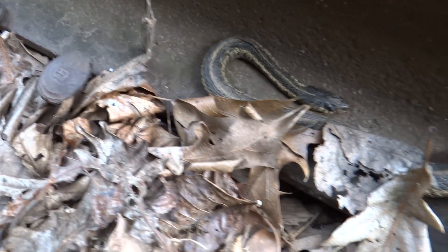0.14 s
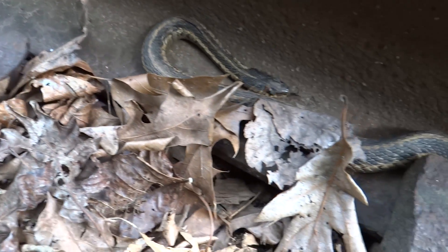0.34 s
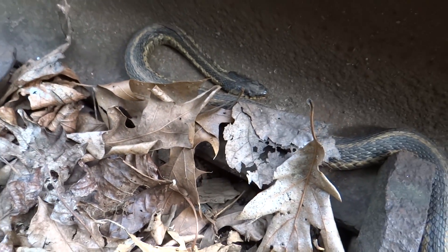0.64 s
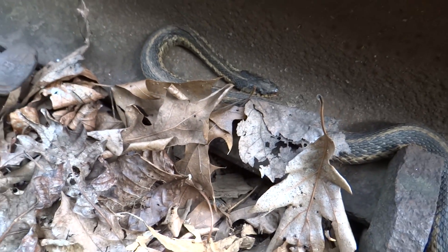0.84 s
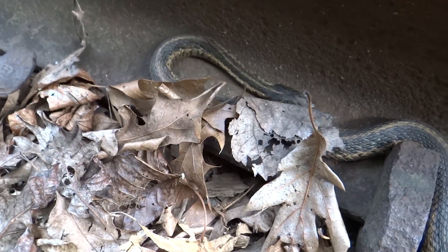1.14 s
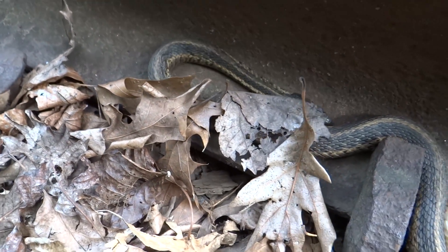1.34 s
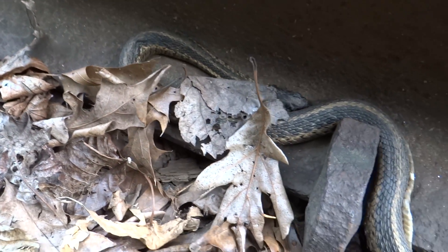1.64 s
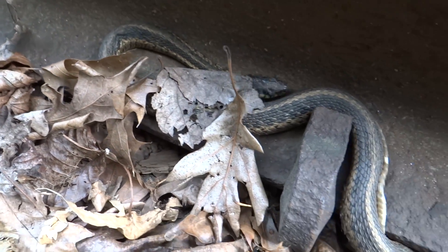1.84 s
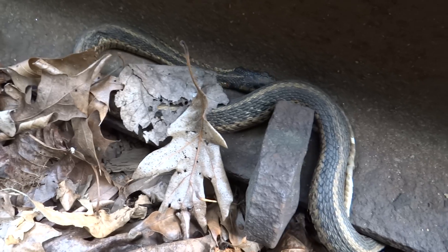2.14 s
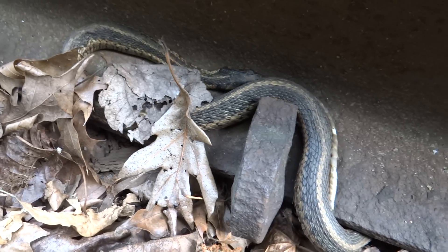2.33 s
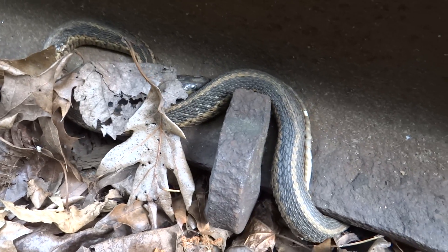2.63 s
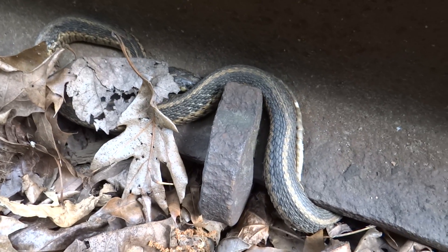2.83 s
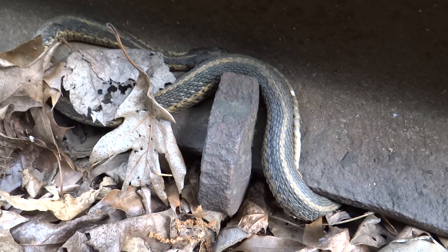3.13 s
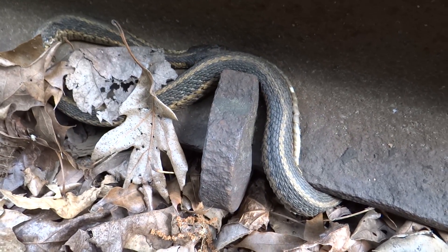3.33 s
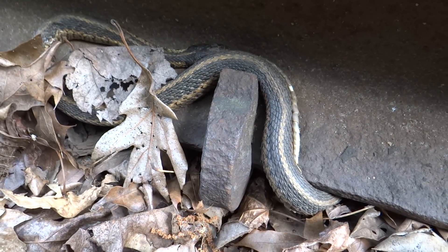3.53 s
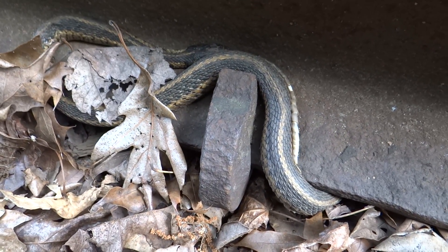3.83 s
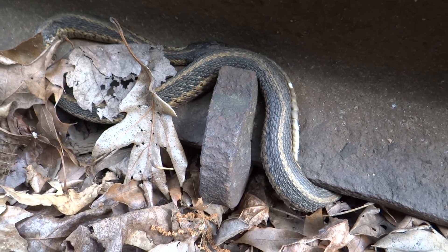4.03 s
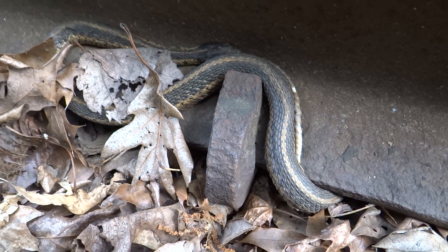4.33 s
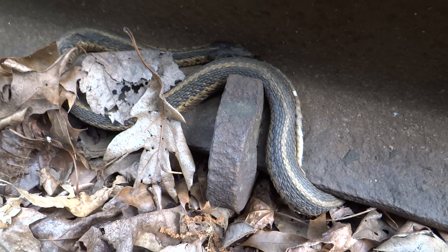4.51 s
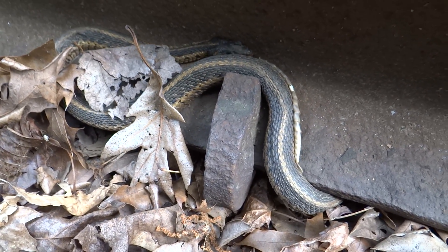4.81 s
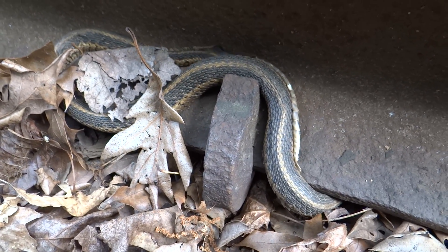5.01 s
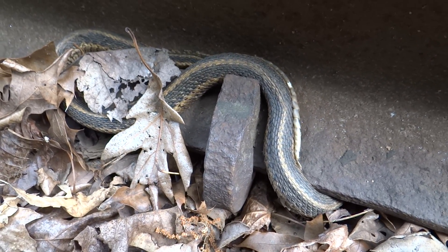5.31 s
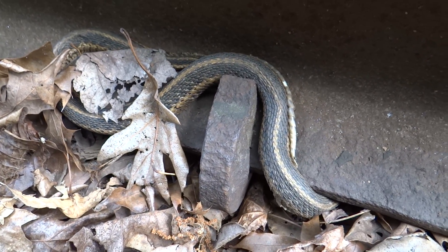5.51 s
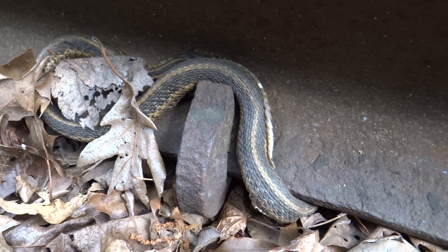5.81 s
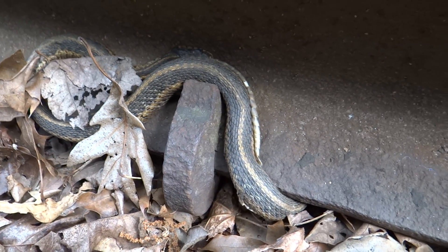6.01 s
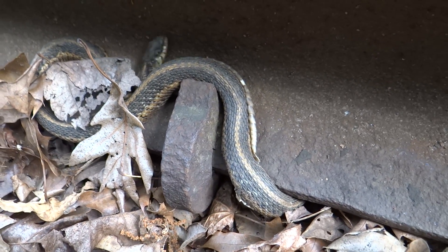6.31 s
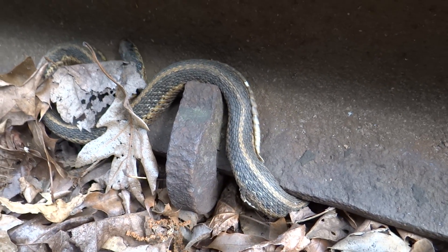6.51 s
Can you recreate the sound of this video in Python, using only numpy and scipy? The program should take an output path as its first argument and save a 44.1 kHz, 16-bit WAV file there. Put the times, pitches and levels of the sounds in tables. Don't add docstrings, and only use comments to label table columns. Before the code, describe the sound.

A snake slides through dry oak leaves on stone, with crisp rustling, ticks and snaps over a faint insect drone.

```python
import sys
import numpy as np
from scipy import signal
from scipy.fft import rfft, irfft, next_fast_len
from scipy.io import wavfile

SR = 44100
rng = np.random.default_rng(int(sys.argv[2]) if len(sys.argv) > 2 else 0)


def convert_level_to_amplitude(level_db):
    exponent = np.asarray(level_db, float) / 20
    return 10 ** exponent


def generate_wav(signal):
    frames = np.transpose(np.atleast_2d(signal))
    scaled = np.clip(frames, -1, 1) * 32767
    pcm = np.round(scaled).astype(np.int16)
    wavfile.write(sys.argv[1], SR, pcm)


N = 293485

# (time [s], scraping left-right [dB], cracks left-right [dB],
# finest hiss re scraping [dB])
COIL_PLACE = [(0, -2.5, 2.5, -21), (2.4, -1, 3.5, -22), (2.5, -0.5, 3.5, -17), (3.3, -1, 3.5, -18),
              (4.1, -7, -5, -14), (4.33, -3, -5.5, -4), (4.8, -4.5, -6.5, -10), (4.95, 0, 2, -20),
              (5.3, -6.5, -2.5, -15), (5.9, -1.5, -9, -14), (6.03, -.5, -0.5, -15), (6.65, 0, 5, -24)]


def in_time(rows):
    s, *columns = np.transpose(rows)
    return [np.interp(np.arange(N) / SR, s, column) for column in columns]


def at_hz(points, hz):
    point_hz, point_db = np.array(points).T
    return np.interp(np.log(hz + 1), np.log(point_hz), point_db)


def rms_one(x):
    return x / np.sqrt(np.mean(x ** 2) + 1e-20)


def drift(rate):
    knots = rng.standard_normal(400)
    return np.interp(np.arange(N) / SR * rate, np.arange(len(knots)), knots)


def band_filter(x, low_hz, high_hz):
    return signal.sosfilt(signal.butter(2, [low_hz, high_hz], "band", fs=SR, output="sos"), x)


def resonance(x, hz, width_hz):
    r = np.exp(-np.pi * width_hz / SR)
    poles = [1, -2 * r * np.cos(2 * np.pi * hz / SR), r * r]
    return signal.lfilter([(1 - r * r) / 2, 0, (r * r - 1) / 2], poles, x)


def add(out, s, sound, peak_db, pan_db):
    top = np.argmax(np.abs(sound))
    at = max(round(s * SR) - top, 0)
    sound = (sound / np.abs(sound[top]))[:N - at] * convert_level_to_amplitude(peak_db)
    out[:, at:at + len(sound)] += sound * convert_level_to_amplitude(np.array([[pan_db / 2], [-pan_db / 2]]))


def effort():
    # (time [s], scraping level [dB])
    creep = [(0, -52), (.35, -65), (.5, -58), (.93, -58), (1.0, -47), (2.4, -47), (2.7, -56.5), (3.25, -50),
             (3.35, -62), (3.8, -62), (4.33, -52.5), (4.9, -49.5), (5.7, -48), (6.3, -46.5), (6.65, -44)]
    # (start [s], hold [s], scraping level [dB])
    pushes = [(0, .01, -44.5), (0.067, .03, -45), (0.166, 0.17, -47.5), (0.95, .03, -46.5),
              (1.1, 0.1, -42.5), (1.203, 0.045, -41.5), (1.38, 0.069, -48), (1.897, 0.031, -47),
              (1.993, 0.027, -48), (2.182, 0.047, -44.5), (2.296, 0.077, -50), (2.527, 0.033, -41),
              (2.567, 0.084, -47.5), (2.782, 0.043, -51), (3.058, 0.044, -42.5), (3.223, .01, -43),
              (4.436, 0.19, -52), (4.733, 0.038, -46), (5.11, .03, -56), (5.275, 0.0046, -47),
              (5.37, 0.11, -46.5), (5.555, .05, -50), (5.72, .03, -44.5), (6.043, 0.0099, -29),
              (6.08, 0.031, -31), (6.138, 0.028, -33.5), (6.205, 0.0089, -40), (6.255, 0.01, -33.5)]
    rise_db_per_s, fall_db_per_s = 605, 312
    time = np.arange(0, N / SR, 1 / 1000)
    power = convert_level_to_amplitude(np.interp(time, *np.transpose(creep))) ** 2
    for s, hold, level_db in pushes:
        before_db = rise_db_per_s * np.maximum(s - time, 0)
        after_db = fall_db_per_s * np.maximum(time - s - hold, 0)
        power = power + convert_level_to_amplitude(level_db - np.minimum(before_db + after_db, 99)) ** 2
    return np.interp(np.arange(N) / SR, time, 10 * np.log10(power))


def rustle(bright_db, per_s):
    # (frequency [Hz], level per Hz [dB])
    leaf_colour = [(1060, -32), (1800, -7), (2040, 0.5), (2880, -4), (3580, 2), (4700, -5.5), (8480, 0.5),
                   (10100, 2.5), (11600, -6.5), (13100, -14), (15700, -13)]
    pan_db, _, top_db = in_time(COIL_PLACE)
    body_db = 8.5 - .45 * (bright_db + 48)

    at = np.flatnonzero(rng.random(N) < per_s * convert_level_to_amplitude(2.0 * drift(55.)) / SR)
    heights = convert_level_to_amplitude(3.1 * np.minimum(rng.exponential(1, N), 4))
    sizes = (heights * rng.choice([-1, 1], N))[at]
    edges = np.geomspace(1800, 16000, num=15)
    layers = np.zeros((3, N))
    own = rng.standard_normal(N)
    for k, (low, high) in enumerate(zip(edges, edges[1:])):
        slips = np.full(N, 1e-18)
        strength = convert_level_to_amplitude(7.4 * np.roll(own, 977 * k)[at])
        slips[at] = sizes * strength * np.sign(np.roll(own, 31 * k + 5)[at])
        band = band_filter(slips, low, high)
        band *= convert_level_to_amplitude(3.0 * drift(45.))
        layer = int(low > 6200) + int(low > 13000)
        layers[layer] += band * convert_level_to_amplitude(at_hz(leaf_colour, np.sqrt(low * high)))
    body, bright, top = map(rms_one, layers)
    sound = convert_level_to_amplitude(bright_db - 5.5) * (bright + convert_level_to_amplitude(body_db - 4.5) * body + convert_level_to_amplitude(top_db + 5) * top)

    heavy = band_filter(slips, 250, 1800)
    sound += convert_level_to_amplitude(1.5 * (bright_db + 32.0) - 40.5) * rms_one(heavy)
    spread = 0.14 * np.roll(sound, 211) * np.array([[1], [-1]])
    return (sound + spread) * convert_level_to_amplitude(np.array([pan_db / 2, -pan_db / 2]))


def crack(hz, rise, t60, sharp, click_db, broad_db):
    time = np.arange(2048) / SR
    swell = (1 - np.exp(-time / max(rise, 1e-5))) ** 2
    push = rng.standard_normal(2048) * swell * convert_level_to_amplitude(-60 * time / max(t60, .002))
    push[round(2 * rise * SR)] += convert_level_to_amplitude(click_db)

    def twice(centre_hz, width_hz):
        return resonance(resonance(push, centre_hz, width_hz), centre_hz, width_hz)

    ringing = twice(hz, hz / sharp)
    upper = twice(hz * 2.3, hz)
    lower = twice(hz * 0.72, hz / 2) * 2
    return ringing + convert_level_to_amplitude(broad_db) * (lower - upper / 2)


def stray_ticks(effort_db):
    per_s, centre_hz, over_db = 19, 8900, 18
    gap, size, pitch = rng.random((200, 3)).T
    times = np.cumsum(-np.log(gap)) / per_s
    return [(s, effort_db[int(s * SR)] + over_db - 8 * a, centre_hz * (.82 + 0.47 * b))
            for s, a, b in zip(times, size, pitch) if s < (N - 1) / SR]


def ticks_and_snaps(effort_db):
    # (time [s], peak [dB], pitch [Hz])
    ticks = [(0.0312, -21.5, 7400), (0.0798, -26, 9440), (1.2586, -13.5, 8300), (1.272, -22, 10700),
             (1.297, -31, 7800), (1.394, -26, 9530), (1.889, -25, 9400), (1.946, -28, 8920),
             (2.006, -25, 9200), (2.2558, -20.5, 10500), (2.3291, -27, 10700), (2.36, -28, 9300),
             (2.3836, -21, 10400), (2.5155, -16, 9300), (2.5693, -24, 9520), (2.5883, -29, 10070),
             (2.598, -26, 9030), (2.851, -28, 9900), (2.9814, -29.5, 9400), (3.0476, -28, 8900),
             (3.098, -23.5, 9200), (3.1584, -28, 8520), (3.2252, -20.5, 8970), (4.4616, -27, 7230),
             (5.2274, -29, 7250), (5.2751, -14.5, 6450), (5.2768, -14, 8600), (5.6467, -26.5, 9100),
             (5.9856, -29, 7510), (6.556, -26, 9100)]
    # (time [s], peak [dB], pitch [Hz])
    snaps = [(2.2041, -28, 3960), (4.3647, -19.5, 2030), (4.369, -21, 2500), (4.3855, -12, 2160),
             (4.39, -32, 2440), (4.393, -22, 1800), (4.4505, -25, 2220), (4.4572, -9, 2740),
             (4.4955, -24, 1700), (4.5792, -16.5, 2150), (4.614, -15.5, 5300), (4.6359, -17.5, 5700),
             (4.6555, -24.5, 3140), (4.7243, -22.5, 5700), (4.738, -18, 2560), (4.803, -21.5, 3620),
             (4.8397, -24.5, 3430), (5.228, -27, 3010), (5.293, -29, 2800), (5.319, -28, 3900),
             (5.361, -21.5, 3120), (5.3733, -24, 2350), (5.381, -25, 2700), (5.3947, -23, 3100),
             (5.4069, -20.5, 2580), (5.4333, -23, 2900), (5.543, -20, 5440), (5.5532, -20, 2100),
             (5.596, -14.5, 2400), (5.985, -20.5, 2920)]
    # (time [s], peak [dB], pitch [Hz])
    heap = [(6.0408, -15, 8400), (6.0437, -10, 9500), (6.0547, -15, 9280), (6.0693, -24, 8800),
            (6.0778, -21, 2835), (6.092, -17, 8320), (6.0972, -16, 7600), (6.1243, -18, 6760),
            (6.1246, -13.5, 3060), (6.131, -21, 2980), (6.114, -22, 6500), (6.16, -24, 5050),
            (6.141, -12, 7200), (6.1422, -16.5, 2680), (6.1492, -9, 3200), (6.166, -19, 3660),
            (6.1711, -26, 8980), (6.2059, -20, 9500), (6.2094, -14, 8800), (6.213, -18, 9460),
            (6.218, -18.5, 3150), (6.2453, -19, 9510), (6.246, -23, 3460), (6.2589, -23, 8200),
            (6.2652, -19, 8740), (6.2667, -16, 4560), (6.2898, -29, 7030), (6.3065, -34, 9570),
            (6.419, -27, 9600)]
    # (time [s], peak [dB])
    splinters = [(1.2585, -34), (2.515, -26), (3.2238, -23), (4.31, -34), (4.461, -33), (4.614, -33),
                 (4.636, -32), (4.725, -28), (4.744, -35), (4.762, -34), (5.12, -33), (5.2785, -23),
                 (6.64, -33)]
    # (time [s], peak [dB], pitch [Hz])
    curled = [(.088, -25.5, 5850), (2.502, -30, 6440), (2.5132, -21.5, 3390), (2.513, -17.5, 5100),
              (2.5185, -21, 3560), (2.532, -30, 5120), (2.536, -28, 5480), (4.734, -26.5, 3250),
              (3.2253, -22, 3200), (5.2704, -24, 3620), (5.272, -19, 3350), (5.2751, -8.5, 2870),
              (5.5393, -26.5, 3280), (5.544, -17.5, 3220)]
    thin_above_hz, splinter_hz, scatter_db = 6000, 14320, 4

    out = np.zeros((2, N))
    pan_db = in_time(COIL_PLACE)[1]
    cracks = ticks + snaps + heap + stray_ticks(effort_db)
    cracks = cracks + [(s, peak_db, splinter_hz) for s, peak_db in splinters]
    for s, peak_db, hz in cracks:
        side_db = pan_db[int(s * SR)]
        if hz > thin_above_hz:
            sound = crack(hz, .0003, t60=0.0077, sharp=2.6, click_db=8.0, broad_db=-14.0)
            side_db += scatter_db * rng.standard_normal()
        else:
            sound = crack(hz, .0003, t60=0.01, sharp=2.08, click_db=12, broad_db=-10)
        add(out, s, sound, peak_db, side_db)
    for s, peak_db, hz in curled:
        sound = crack(hz, .0008, t60=0.017, sharp=3.87, click_db=10, broad_db=-15)
        add(out, s, sound, peak_db, pan_db[int(s * SR)])
    return out


def stone(x):
    # (delay [s], left level [dB], right level [dB])
    reflections = [
        (.0011, -25.5, -24),
        (.0027, -22, -19),
        (.0052, -17, -17),
        (.0083, -20.5, -20),
    ]
    out = x.copy()
    for s, *level_db in reflections:
        lag = round(s * SR)
        out[:, lag:] += convert_level_to_amplitude(np.array(level_db))[:, None] * x[::-1, :-lag]
    return out


def bumps():
    # (time [s], peak [dB], pitch [Hz])
    contacts = [(4.393, -39, 300), (4.495, -28, 500), (4.5, -32, 220), (4.551, -31, 900), (4.583, -29, 560),
                (4.737, -26.5, 570), (4.749, -33, 480), (5.276, -35.5, 350), (5.531, -38, 300),
                (6.051, -38, 600), (6.134, -27, 480), (6.15, -18, 990), (6.153, -27.5, 400),
                (6.21, -22, 804), (6.222, -24.5, 940), (6.265, -28, 386), (6.27, -21, 970)]
    shortest_s, cycles, housing_cut_hz = 0.019, 14, 110
    out = np.zeros((2, N))
    for s, peak_db, hz in contacts:
        sound = crack(hz, .001, shortest_s + cycles / hz, sharp=.8, click_db=15.5, broad_db=-19.5)
        add(out, s, sound, peak_db, -1.5)
    return signal.sosfilt(signal.butter(2, housing_cut_hz, "high", fs=SR, output="sos"), out)


def bird():
    # (time [s], pitch [Hz], level [dB])
    glide = [(0, 3610, -47), (.025, 3490, -33.5), (.034, 3435, -65), (.045, 3424, -40), (.1, 3394, -47),
             (.16, 3300, -48), (.21, 3310, -58), (.32, 3340, -100)]
    hz, level_db = in_time(glide)
    direct = convert_level_to_amplitude(level_db + 3.5 * drift(55.)) * np.sin(2 * np.pi * np.cumsum(hz) / SR)
    late = np.roll(direct, round(0.039 * SR)) * convert_level_to_amplitude(-4)
    return direct + late


def wide_noise(gain):
    # (frequency [Hz], left-right likeness [0 to 1])
    likeness = [(40, 0.78), (90, 1), (240, 0.88), (950, 0.91), (4000, 0.9), (9000, 0.85), (15000, 1)]
    size = next_fast_len(N)
    hz = np.arange(size // 2 + 1) * SR / size
    mid, side = rfft(rng.standard_normal((2, size)))
    alike = np.clip(at_hz(likeness, hz), 0, 1)
    both = np.sqrt(1 + alike) * mid + np.sqrt(1 - alike) * side * np.array([[1], [-1]])
    return rms_one(irfft(both * gain(hz), size)[:, :N])


def band_shape(centre_hz, width_hz, steep):
    return lambda hz: 1 / (1 + (np.abs(hz - centre_hz) / width_hz) ** steep)


def outdoors():
    # (frequency [Hz], level per Hz [dB])
    air_low = [(24, -65), (40, -35), (118, -14), (426, -6.5), (516, -3.5), (642, -2.5), (1050, 2),
               (1360, -2.5), (2310, -120)]
    # (frequency [Hz], level per Hz [dB])
    air_high = [(970, -30), (1650, 1.5), (1870, -0.5), (2320, -0.5), (3610, -1), (4700, -7), (5950, -5),
                (6470, -11), (8830, -17), (11600, -23), (13400, -41), (14200, -31), (15700, -34)]
    # (time [s], level [dB])
    cricket_level = [(0, -54), (1.2, -58), (2.2, -49.5), (3.2, -66), (4.5, -70), (6.65, -53)]
    # (time [s], level [dB])
    rumble_level = [(0.0, -64), (1.46, -66.5), (1.72, -75), (4.31, -74.5), (4.56, -72), (5.13, -83),
                    (6.02, -80), (6.65, -85)]
    spectrum = air_low[:-1] + [(hz, db - 1.0) for hz, db in air_high[1:]]
    air = convert_level_to_amplitude(-44 + 0.4 * drift(2.336)) * wide_noise(lambda hz: convert_level_to_amplitude(at_hz(spectrum, hz)))
    drone = convert_level_to_amplitude(-42 + 0.48 * drift(3.9)) * wide_noise(band_shape(1320, 106.5, 2.07))
    crickets = convert_level_to_amplitude(in_time(cricket_level)[0]) * wide_noise(band_shape(5520, 370, 1.3))
    rumble = convert_level_to_amplitude(in_time(rumble_level)[0] - 4) * wide_noise(band_shape(112, 25, 3.1))
    return air + drone + crickets + rumble


def scene():
    effort_db = effort()
    leaves = rustle(effort_db, per_s=5000.) + ticks_and_snaps(effort_db)
    return stone(leaves) + bumps() + bird() + outdoors()


def low_pass(x):
    return signal.sosfilt(signal.butter(12, 17100, fs=SR, output="sos"), x)


def record(dry):
    dip = dry - .75 * resonance(dry, 13600, 2200)
    cutoff_hz = 15750
    cut = signal.sosfilt(signal.ellip(10, .5, 70, cutoff_hz, fs=SR, output="sos"), dip)
    return low_pass(cut)


dry = scene()
out = record(dry)
generate_wav(out)
```